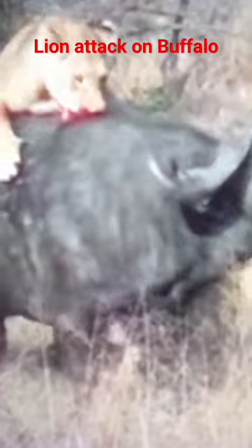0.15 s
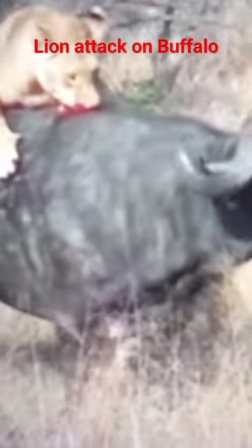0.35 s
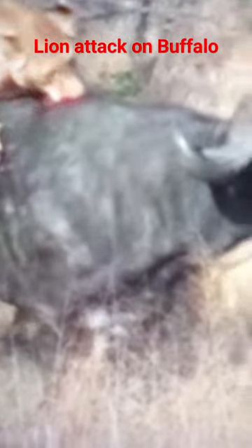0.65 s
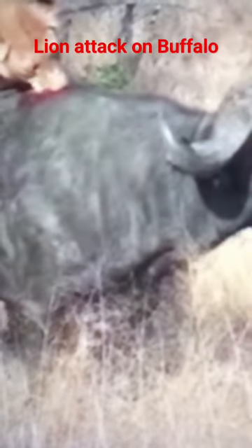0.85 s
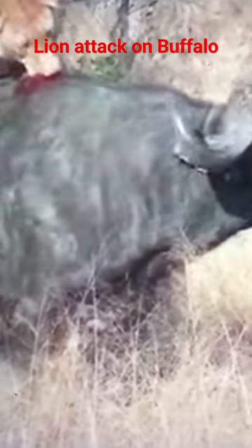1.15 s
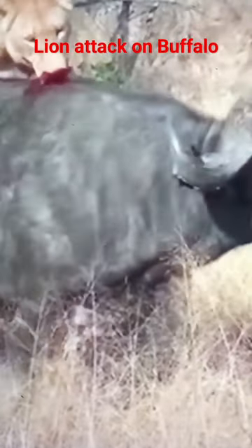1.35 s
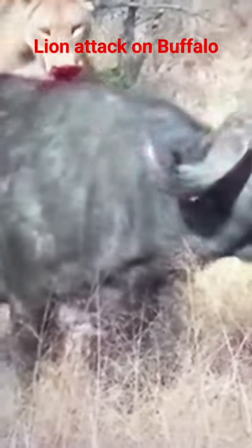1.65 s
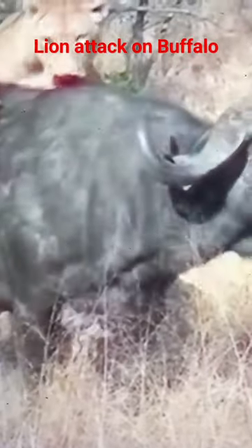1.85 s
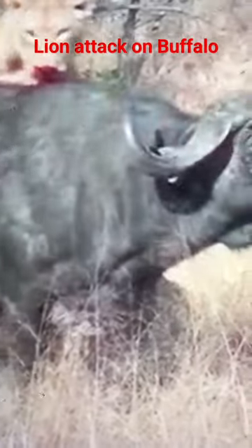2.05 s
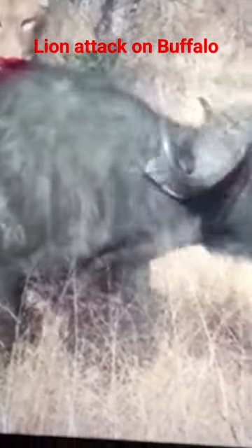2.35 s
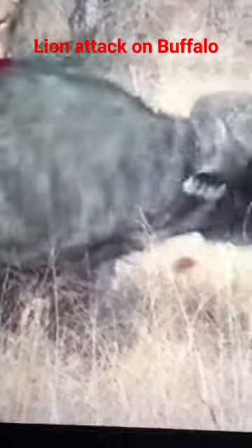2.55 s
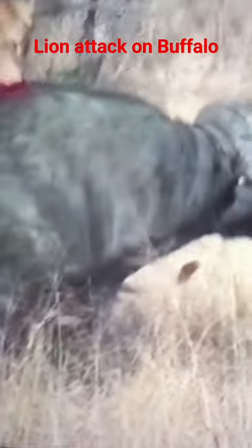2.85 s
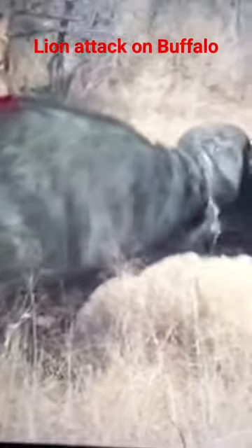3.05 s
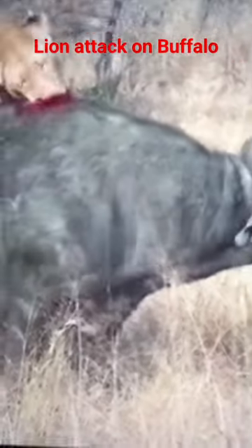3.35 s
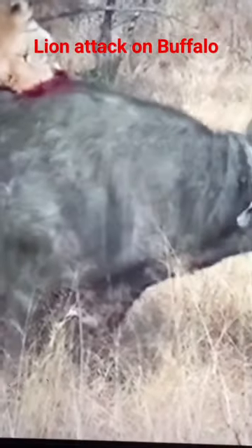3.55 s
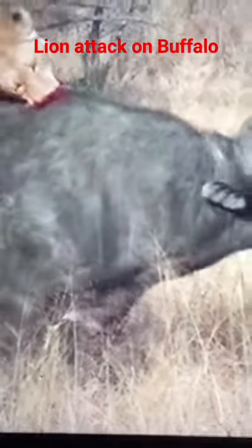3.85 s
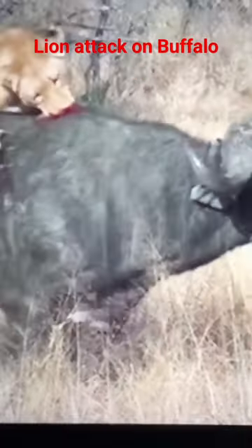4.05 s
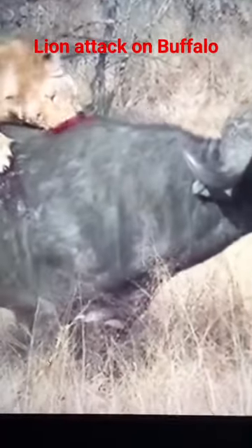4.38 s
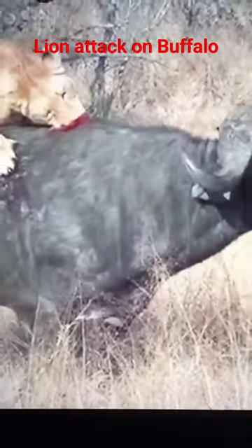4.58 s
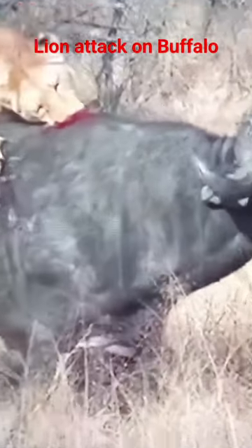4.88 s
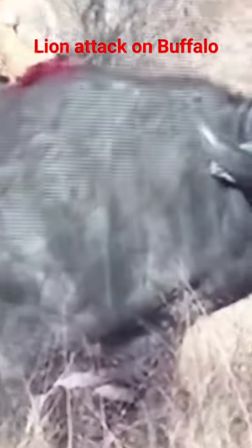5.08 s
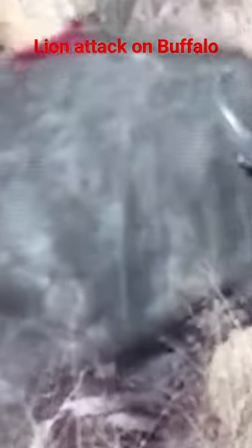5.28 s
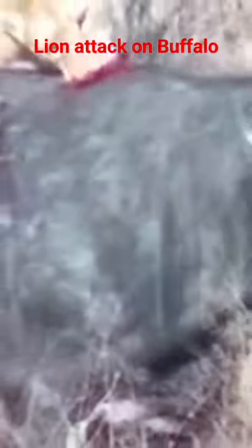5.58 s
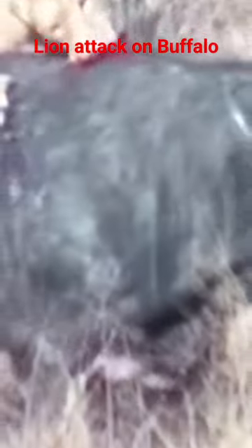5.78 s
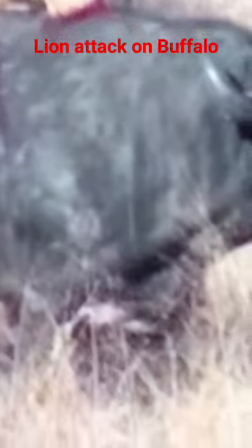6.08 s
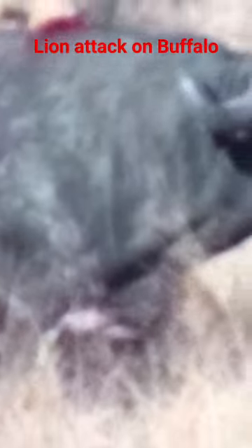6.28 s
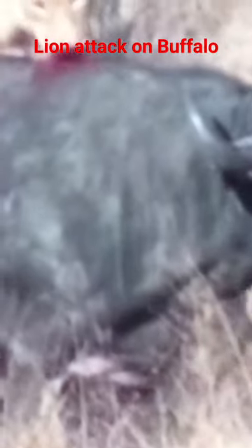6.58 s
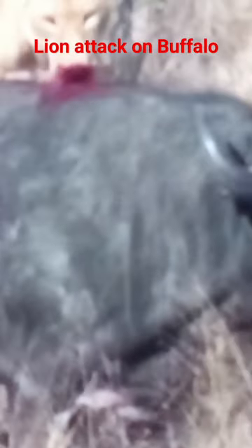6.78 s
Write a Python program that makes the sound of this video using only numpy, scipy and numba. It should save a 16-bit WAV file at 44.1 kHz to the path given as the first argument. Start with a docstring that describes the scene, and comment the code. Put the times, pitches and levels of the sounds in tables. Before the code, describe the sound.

After a brief silence, a buffalo bellows for about a second, its low rattling voice growing hoarse and collapsing into a rush of air. Dry growth crackles, a short huff and ragged throat creaks follow with a dull knock, then a longer, harsher bellow ends in another huff. Later come crackles, faint bird whistles and a last weak huff. One microphone outdoors, with leafy hiss and low murmur.

```python
"""Outdoors among dry, leafy growth, one microphone: a buffalo under attack bellows twice over a steady hiss.
Its vocal folds slap slowly enough to rattle, ringing the moving resonances of throat, mouth and nose.
Each bellow breaks up into a hoarse rush of air; a huff comes before the second and another near the end.
Ragged, uneven slaps lead into and out of the voice. Clumps of snaps make dry crackles, ringing modes a dull knock,
and gliding tones two faint pairs of bird whistles, over coloured noise for murmur and leaves and a low hum."""
import sys
import numpy as np
from scipy import signal
from scipy.fft import rfft, irfft
from scipy.io import wavfile
from scipy.ndimage import uniform_filter1d, minimum_filter1d
from numba import njit

SR = 44100
rng = np.random.default_rng(int(sys.argv[2]) if len(sys.argv) > 2 else 0)


def wrap_up_sound(samples):
    """Save the sound to the file named by the first command line argument, as 16-bit audio."""
    columns = np.atleast_2d(samples).T
    # keep every value between -1 and 1, then stretch to whole-number steps
    tamed = np.clip(columns, -1, 1)
    steps = np.round(tamed * 32767).astype(np.int16)
    wavfile.write(sys.argv[1], SR, steps)


N = 305524
TIME = np.arange(N) / SR
START_S = 0.18  # silence until here


def from_db(db):
    """Decibels to gain."""
    return 10 ** (np.asarray(db) / 20)


def rms_one(x):
    """Scale to unit rms."""
    return x / np.sqrt(np.mean(x ** 2) + 1e-20)


def along(rows, t):
    """Each column of a curve table at the times t."""
    s, *columns = np.transpose(rows)
    return [np.interp(t, s, c) for c in columns]


def drift(rate, t):
    """Random curve through knots of spread 1, rate knots per second."""
    knots = np.arange(0, N / SR + 1, 1 / rate)
    return np.interp(t, knots, rng.standard_normal(len(knots)))


def colour(x, spectrum):
    """Causal (minimum-phase) filter that keeps the power of white noise."""
    size = 4096
    hz, db = np.transpose(spectrum)
    f = np.maximum(np.arange(size // 2 + 1) * SR / size, 1)
    # beyond the ends of the curve: 48 dB per octave, 60 dB at most
    octaves_outside = np.maximum(np.log2(hz[0] / f), 0) + np.maximum(np.log2(f / hz[-1]), 0)
    gain = from_db(np.interp(np.log(f), np.log(hz), db) - np.minimum(48 * octaves_outside, 60))
    # folding the cepstrum forward gives minimum phase
    cepstrum = irfft(np.log(gain))[:size // 2]
    cepstrum[1:] *= 2
    response = irfft(np.exp(rfft(cepstrum, size)))
    return signal.fftconvolve(x, response / np.linalg.norm(response))[:len(x)]


def noise(spectrum):
    """White noise coloured by a spectrum, near unit rms."""
    return colour(rng.standard_normal(N), spectrum)


@njit
def two_pole(x, angle, r):
    """Band-pass with a moving centre and gain 1 on top."""
    y = np.zeros(len(x))
    for i in range(2, len(x)):
        y[i] = (1 - r * r) / 2 * (x[i] - x[i - 2]) + 2 * r * np.cos(angle[i]) * y[i - 1] - r * r * y[i - 2]
    return y


def resonate(x, hz, width):
    """One resonance, steady or moving."""
    angle = 2 * np.pi * hz / SR * np.ones(len(x))
    return two_pole(x + 1e-18, angle, np.exp(-np.pi * width / SR))


def formant(x, hz, width):
    """Three staggered resonances in a row: a full top with dark valleys on either side."""
    split = np.sqrt(3) / 4 * width
    middle = resonate(x, hz, width)
    return resonate(resonate(middle, hz - split, width / 2), hz + split, width / 2)


def evened(x):
    """Hold the level near rms 1 over a few slaps."""
    power = uniform_filter1d(uniform_filter1d(x ** 2, size=2200), size=1800)
    return x / np.sqrt(np.maximum(power, 0) + 1e-3 * np.mean(x ** 2))


def bursts(times, levels_db, rise, fall):
    """Envelope of short bursts that swell exponentially up to their times and die away after."""
    out = np.zeros(N)
    for s, db in zip(times, levels_db):
        near = slice(int((s - .02) * SR), int((s + .12) * SR))
        age = TIME[near] - s
        out[near] += from_db(db) * np.exp(np.minimum(age / rise, -age / fall))
    return out


def loud(x, knee_db):
    """How loud a sound is from moment to moment, 0-1; one half at the knee."""
    power = abs(uniform_filter1d(x ** 2, size=6000))
    return power / (power + from_db(knee_db) ** 2)


# surfaces close to the path to the microphone: delay [t/s], gain
ECHOES = [(.0027, 0.027), (.00435, 0.27), (.0079, .12)]


def surroundings(x, scatter_db=-12, t60=0.41):
    """A few close reflections and a short scattered tail."""
    at, t = np.arange(len(x)), TIME[:SR // 3]
    early = sum(gain * np.interp(at - delay * SR, at, x, left=0) for delay, gain in ECHOES)
    tail = rng.standard_normal(len(t)) * from_db(-60 * t / t60) * (t > .005)
    scattered = signal.fftconvolve(x, tail / np.linalg.norm(tail))[:len(x)]
    return x + early + from_db(scatter_db) * scattered


# low murmur of the place, spectrum shape: f/Hz, level/dB
MURMUR = [(15, -21.5), (25, -23), (171, -4.5), (204, -7), (400, -14), (429, -12.5), (452, -8), (494, -14),
          (530, -8), (633, -3), (667, -5.5), (916, -6.5), (1150, -9.5), (1420, -17), (1700, -9.5),
          (2210, -37.5), (3740, -120)]
# even microphone hiss, spectrum shape: f/Hz, level/dB
MIC_HISS = [(5000, 1.8), (10000, 2), (15500, -2)]
# leafy hiss, spectrum shape: f/Hz, level/dB
LEAVES = [(880, -43.5), (1500, -30), (1820, -15.5), (1990, -9), (2390, 2), (3260, -10.5), (3950, -8.5),
          (4470, -23.5), (4980, -18.5), (5330, -16), (5840, -22.5), (6140, -30), (7880, -38.5),
          (11000, -49.5), (14300, -78), (22000, -120)]
# highest rustle and hiss, spectrum shape: f/Hz, level/dB
AIR_HISS = [(3820, -52), (6500, -25), (7190, 0.5), (8220, 1), (9670, -13.5), (13000, -21)]
# faint hum: f/Hz, rms level/dB
HUM = [(133.7, -71.5), (156, -89.5), (178.5, -68.5)]
# the dry growth stirs: centre [t/s], half length [t/s], leafy hiss [level/dB], high rustle [level/dB]
STIRS = [(2.365, 0.38, -46.5, -66.5), (6.305, 0.53, -49, -76), (6.95, 0.21, -44, -86)]
# levels before flicker and dips
MURMUR_DB, MIC_HISS_DB, LEAVES_DB, RUSTLE_DB = -52, -79, -53.5, -84
FADE_IN_S = 0.25


def background(steady_dip_db, leaves_dip_db, flicker_db=2.0):
    """Low murmur, a leafy hiss and a high rustle that swell when the growth stirs, and a faint wavering hum."""
    leafy, rustle = from_db(LEAVES_DB), from_db(RUSTLE_DB)
    for s, half_s, leafy_db, rustle_db in STIRS:
        swell = np.exp(-((TIME - s) / half_s) ** 2)
        leafy = leafy + from_db(leafy_db) * swell
        rustle = rustle + from_db(rustle_db) * swell
    hum = np.zeros(N)
    for hz, db in HUM:
        wavering_hz = hz + 1.2 * drift(7.0, TIME)
        hum += from_db(db) * np.sqrt(2) * np.sin(2 * np.pi * np.cumsum(wavering_hz) / SR)
    flicker = from_db(flicker_db * drift(55, TIME))
    leaves = (leafy * noise(LEAVES) + rustle * noise(AIR_HISS)) * flicker
    steady = from_db(MURMUR_DB) * noise(MURMUR) + from_db(MIC_HISS_DB) * noise(MIC_HISS)
    fade_in = np.clip((TIME - START_S) / FADE_IN_S, 0, 1)
    return ((hum + steady) * from_db(steady_dip_db) + leaves * from_db(leaves_dip_db)) * fade_in


# distant bird whistles: start [t/s], length [t/s], start f/Hz, end f/Hz, peak level/dB before the reflections
CHIRPS = [(5.62, .06, 7100, 6470, -71), (5.679, 0.05, 5800, 5300, -57), (6.672, 0.086, 6800, 6500, -65),
          (6.719, 0.052, 5520, 5060, -46.5)]


def birds():
    """Thin, wavering, falling whistles, blurred by distance."""
    out = np.zeros(N)
    for s, length, start_hz, end_hz, db in CHIRPS:
        part = np.clip((TIME - s) / length, 0, 1)
        hz = start_hz + (end_hz - start_hz) * part + 150 * drift(610, TIME)
        out += from_db(db) * np.sin(np.pi * part) * np.sin(2 * np.pi * np.cumsum(hz) / SR)
    return surroundings(out, scatter_db=-8, t60=.25)


# modes of a hollow thing: f/Hz, width [f/Hz], gain [level/dB]
KNOCK = [(128, 120, 15.5), (337, 390, 25.5), (514, 230, 31), (4170, 5000, -7.5)]
KNOCK_S = 2.691


def knock():
    """One sharp contact on something hollow: a click rings its modes to a dull knock."""
    click = np.zeros(N)
    click[int(KNOCK_S * SR)] = 1
    return sum(from_db(db) * formant(click, hz, width) for hz, width, db in KNOCK)


# dry crackles: t/s, body [level/dB], treble [level/dB], both before trim and colour
CRACKLES = [(2.232, -31.5, -40), (2.267, -37, -46), (2.2735, -31, -59), (2.299, -27.5, -41),
            (2.321, -27.5, -43), (2.353, -29.5, -40.5), (2.376, -32, -55), (2.391, -28.5, -53),
            (2.4085, -24.5, -41), (3.13, -55, -51), (3.203, -44, -50), (4.284, -47, -51), (4.357, -46, -49),
            (4.409, -50, -51), (4.466, -42, -54), (5.877, -35.5, -37.5), (5.907, -46, -45),
            (5.917, -45, -49), (5.923, -33, -58), (5.949, -28, -38.5), (5.967, -37, -46),
            (6.003, -32.5, -39), (6.027, -34, -47), (6.057, -27, -41), (6.078, -29.5, -39),
            (6.108, -39, -43), (6.117, -51, -48), (6.1248, -31, -60), (6.1511, -28.5, -37),
            (6.169, -34.5, -43), (6.181, -42, -63), (6.202, -29.5, -36.5), (6.2587, -25.5, -40.5)]
# body of the earlier run, then of the later run, spectrum shape: f/Hz, level/dB
CRACKLE_BODY = [
    [(240, -68), (400, -24), (541, -5), (766, -4), (934, -7.5), (1690, -2), (2840, -3), (3490, -20),
     (3800, -12), (4940, -36), (8360, -120)],
    [(240, -49), (400, -32), (647, -6.5), (842, 0.5), (1130, -25.5), (1390, -7.5), (1820, -7), (2080, 4.5),
     (2330, 2), (3090, -5.5), (3800, -49.5), (4940, -71), (8360, -120)],
]
# treble of the crackles, spectrum shape: f/Hz, level/dB
CRACKLE_TOP = [(3600, -30), (4000, 4), (4740, 9.5), (5400, 19), (6000, 9.5), (6740, 2), (7930, 5.5),
               (9500, -15), (13000, -33)]
# vocal folds, one table per bellow, from its first slap to its last: t/s, slap rate [f/Hz]
PITCH = [
    [(0.2169, 80.63), (0.28, 82.98), (0.5, 77.7), (0.61, 79.07), (0.75, 77.72), (1.06, 69.5), (1.21, 67.05),
     (1.36, 54.53)],
    [(2.7449, 44.35), (2.83, 62.18), (2.91, 69.6), (3.08, 74.88), (3.29, 76.86), (3.36, 78.06),
     (3.48, 74.38), (3.75, 76.19), (3.84, 74.95), (4.15, 76.27), (4.22, 73.83), (4.42, 73.54), (4.5, 75.09),
     (5.045, 69.12)],
]  # also played by folds(); its second start divides the crackle runs


def crackles(body_db=-1, top_db=0.5, grain_db=0.0, follow_s=0.013):
    """Each crackle is a clump of tiny snaps (noise bursts), with weaker clumps scattered around it."""
    rise_s, fall_s, follow_db = .0018, .0024, -15
    s, peak_db, treble_db = np.transpose(CRACKLES)
    strays = (s[:, None] + follow_s * rng.uniform(-1.42, 1.6, (len(s), 2))).ravel()

    def clumps(db):
        """Main bursts and their strays, filled with noise."""
        grain = rng.standard_normal(N) * from_db(grain_db * drift(1500, TIME))
        main = bursts(s + 0.0024, db, rise_s, fall_s)
        return grain * (main + bursts(strays, np.repeat(db, 2) + follow_db, rise_s, fall_s))

    body, top = clumps(peak_db + body_db), clumps(treble_db + top_db)
    later = TIME > PITCH[1][0][0]
    body = sum(colour(body * run, shape) for run, shape in zip([~later, later], CRACKLE_BODY))
    return surroundings(body + colour(top, CRACKLE_TOP), scatter_db=-10, t60=.14)


# huffs of hoarse air: start [t/s], attack [t/s], hold [t/s], release [level/dB per s],
# throat, rasp and hiss [level/dB, before tilt and gusts], hiss f/Hz, hiss width [f/Hz]
HUFFS = [(1.345, 0.045, 0.15, 157, -33, -30, -57, 7640, 1990),
         (2.435, 0.14, 0.053, 595, -40.5, -32, -61, 8400, 2700),
         (5.003, 0.086, 0.15, 171, -33, -28, -57.5, 8330, 3000),
         (6.222, 0.034, 0.09, 76, -30, -37, -67, 7700, 1990)]
# air in the throat, one spectrum shape per huff: f/Hz, level/dB
AIR_THROAT = [
    [(120, -64), (200, -13), (237, -52), (300, -11), (365, -23.5), (538, -10.5), (727, -5), (869, 4),
     (1280, -1.5), (1900, -22), (2470, -31), (4180, -120)],
    [(180, -73), (300, -21), (1030, -7), (1150, -4), (1440, -14), (1900, -30), (2470, -44), (4180, -120)],
    [(76, -48), (130, -15), (238, -33), (298, -13.5), (408, -28), (452, -6), (523, -17), (876, 3.5),
     (1010, -4.5), (1280, -6.5), (1450, -22), (1900, -14), (2470, -41), (4180, -120)],
    [(180, -64), (300, -29), (381, -30), (552, -16), (838, 3), (1030, -12.5), (1350, -13), (1460, -25),
     (1900, -28), (2470, -46), (4180, -120)],
]
# raspy air, spectrum shape: f/Hz, level/dB
AIR_RASP = [(940, -38), (1600, -0.5), (1910, -6), (2130, 10), (2310, 2.5), (3110, 0.5), (3390, -1),
            (3710, 3), (4000, -10), (4330, -5.5), (4700, -24.5), (5470, -16), (6170, -42.5), (6800, -56),
            (8840, -106), (15000, -120)]
# change while a huff is held: throat, rasp, hiss [level/dB per s]
HUFF_TILT_DB_PER_S = (24.5, -36, -47)
# flaps of the slack throat that let gusts through: t/s, gust against the steady air [level/dB]
FLAPS = [(1.405, 3), (1.433, -5), (1.459, 2), (1.489, 6), (1.51, 1), (1.542, -8), (1.574, 3), (5.085, -10),
         (5.103, -19), (5.139, -4), (5.159, 1.5), (5.181, 1), (5.213, -10), (5.246, -4), (6.25, -8),
         (6.285, -12), (6.293, -1), (6.339, 0), (6.354, -4), (6.374, 1), (6.424, -4)]


def huffs(flutter_db=2.0, flutter_hz=110, steady_db=-3.0, gust_rise_s=0.0017, gust_fall_s=0.0028):
    """Air rushes through the slack throat, whose flapping lets gusts through; each huff goes from raspy to hollow."""
    rasp, white = noise(AIR_RASP), rng.standard_normal(N)
    out = np.zeros(N)
    for huff, shape in zip(HUFFS, AIR_THROAT):
        start, attack_s, hold_s, release_db_per_s, *levels_db, hiss_hz, hiss_width = huff
        age = np.maximum(TIME - start, 0)
        held = np.minimum(age, attack_s + hold_s)
        envelope = np.minimum(age / attack_s, 1) * from_db(-release_db_per_s * (age - held))
        hiss = rms_one(formant(white, hiss_hz, hiss_width))
        for part, db, tilt_db in zip([noise(shape), rasp, hiss], levels_db, HUFF_TILT_DB_PER_S):
            out += envelope * from_db(db + tilt_db * held) * part
    gusts = 1 + bursts(*np.transpose(FLAPS), gust_rise_s, gust_fall_s)
    ragged = from_db(steady_db + flutter_db * drift(flutter_hz, TIME))
    return surroundings(out * gusts * ragged, scatter_db=-12.5, t60=0.3)


# single slaps where the folds start up or give way:
# t/s, body [level/dB], treble [level/dB], both before trim and colour
CREAKS = [(1.372, -24, -38), (1.403, -31, -35), (1.429, -16.5, -28), (1.456, -23.5, -37),
          (2.461, -23.5, -42.5), (2.521, -23, -38), (2.555, -34, -41), (2.586, -22, -37), (2.592, -28, -32),
          (2.615, -19, -22.5), (2.641, -10.5, -46), (2.675, -11.5, -30), (2.699, -5, -28.5),
          (2.711, -6.5, -29.5), (2.721, -12.5, -26), (5.058, -15.5, -29.5), (5.083, -40, -37),
          (5.1, -31, -26)]


def creaks(body_db=-1, treble_db=3):
    """Ragged slaps of the folds, too unevenly spaced to make a steady pitch: short bursts of coloured noise."""
    s, peak_db, top_db = np.transpose(CREAKS)
    body = bursts(s + 0.0017, peak_db + body_db, 0.00023, 0.0012) * rng.standard_normal(N)
    top = bursts(s + 0.00048, top_db + treble_db, 0.00012, 0.0034) * rng.standard_normal(N)
    # spectrum shapes: f/Hz, level/dB
    body = colour(body, [(450, -15.5), (800, 7.5), (1200, 4.5), (1680, 7.5), (2050, -8.0)])
    top = colour(top, [(2200, -1.5), (2900, 12.5), (3900, -4), (4600, -19.5)])
    return surroundings(body + top)


def folds(pitch, t, roughness, limp_db, jitter_s=0.00021, limp_s=.00018, shimmer_db=-0.2, leak_s=0.0024):
    """One slap per cycle and the turbulence leaking around it; rough folds limp: a crisp slap, then a weak, airy one."""
    cycles = np.cumsum(along(pitch, t)[0] * (t > pitch[0][0])) / SR
    slaps = t[np.flatnonzero(np.diff(np.ceil(cycles)))]
    slaps = slaps[slaps < pitch[-1][0]]
    rough = np.interp(slaps, t, roughness)
    chance = rng.standard_normal((len(slaps), 2))
    turn = (-1) ** np.arange(len(slaps))  # every other slap
    slaps = slaps + rough * (jitter_s * chance[:, 0] + limp_s * turn)
    closure_db = rough * (shimmer_db * chance[:, 1] + limp_db * turn)
    at = np.clip((slaps - t[0]) * SR, 0, len(t) - 1).astype(int)
    pulses, gaps = np.zeros((2, len(t)))
    pulses[at] = from_db(closure_db)
    gaps[at] = from_db(-closure_db)  # a weak slap leaks more air
    opening = signal.fftconvolve(gaps, np.exp(-abs(np.arange(-400, 401)) / SR / leak_s), "same")
    leak = rms_one(opening * rng.standard_normal(len(t))) * np.sqrt(abs(roughness))
    return rms_one(pulses), leak


# turbulence against the slaps, before the roughness scales it: f/Hz, level/dB
LEAK = [(400, -8.5), (1100, -6), (1800, 1.5), (2800, 4), (4000, 5.5), (8000, 3)]
SKIRT_STEEPNESS = 5.3  # power law of each resonance's flanks


def throat(pulses, leak, roughness, modes, hop_size=256):
    """Slaps and turbulence ring moving resonances (Hz, width Hz, dB) all at once (minimum phase), held even."""
    size = 8 * hop_size
    starts = np.arange(0, len(pulses) - 2 * hop_size, hop_size)
    f = np.maximum(np.arange(size // 2 + 1) * SR / size, 1)

    def now(curve):
        """A control at the middle of each block."""
        return curve[starts + hop_size, None] if np.ndim(curve) else curve

    power = from_db(-62.5) ** 2 / (1 + (f / 8000) ** 8)  # fills the valleys
    for hz, width, db in modes:
        offset = abs(2 * (f - now(hz)) / now(width))
        power = power + from_db(now(db)) ** 2 / (1 + offset ** SKIRT_STEEPNESS)
    cepstrum = irfft(np.log(power / power.mean(axis=1, keepdims=True)) / 2)[:, :size // 2]
    cepstrum[:, 1:] *= 2
    response = np.exp(rfft(cepstrum, size))
    leak_hz, leak_db = np.transpose(LEAK)
    air = from_db(np.interp(f, leak_hz, leak_db))
    block = starts[:, None] + np.arange(2 * hop_size)
    window = signal.get_window("hann", 2 * hop_size)
    source = rfft(pulses[block] * window, size) + air * rfft(leak[block] * window, size)
    source = source / np.sqrt(1 + air ** 2 * abs(now(roughness)))
    out = np.zeros(len(pulses) + size)
    for i, ringing in zip(starts, irfft(source * response)):
        out[i:i + size] += ringing
    return evened(out[:len(pulses)])


# the bellows: attack [t/s], level/dB before the sag, seventh resonance f/Hz, roughness at first [0-1],
# turns hoarse after [t/s], roughness then [0-1], limp: even slaps against the mean at full roughness [level/dB]
BELLOWS = [(0.29, -24.5, 5200, 0.1, .385, 0.78, -2.0), (0.0076, -23.5, 5680, 0.12, 0.45, 0.51, 1.5)]
# jaw and tongue move the lower resonances while the throat strains, one table per bellow:
# t/s, main f/Hz, third f/Hz, third width [f/Hz], third [level/dB against main], nasal f/Hz, strain [about 0-1]
MOUTH = [
    [(.3, 1090, 1910, 505, -12.5, 291, 0.07), (.48, 1160, 1980, 497, -13.5, 289, 0.1),
     (.75, 1142, 1950, 280, -10, 262.4, 0.37), (1.05, 1124, 1960, 171, -2.5, 287, 1.02),
     (1.2, 1150, 1996, 150, 2, 293, 1.1), (1.36, 1110, 2140, 150, -5, 283, 0.4)],
    [(2.78, 1300, 1527, 201, 5, 278, 0.7), (2.9, 1350, 1630, 270, -6, 290, 0.33),
     (3.06, 1262, 1640, 280, -1, 291, 0.84), (3.26, 1182, 1640, 211, -4, 285, 0.06),
     (3.4, 1144, 1590, 250, -20.5, 266, 0), (3.52, 1100, 1790, 220, -13.5, 290, 0),
     (4.05, 1160, 1960, 280, -24.5, 313, 0), (4.36, 1176, 1880, 335, -9, 292, 0.56),
     (4.85, 1117, 1990, 400, -9, 290, 0.78), (5.05, 970, 2180, 300, -9.5, 270, 1)],
]
# upper resonances shift and swell as the throat tightens, one table per bellow, levels against main before flicker:
# t/s, fourth f/Hz, level/dB, rasp f/Hz, level/dB, fifth f/Hz, level/dB, sixth level/dB, seventh level/dB
THROAT = [
    [(.3, 2570, -46, 3250, -22, 3560, -21, -38, -37.5),
     (.5, 2590, -17.5, 3200, -29, 3580, -16.5, -25.5, -34),
     (.75, 2650, -11, 2930, -18, 3560, -19, -25, -36), (1.02, 2550, -16.5, 3020, -14, 3750, -9.5, -37, -35),
     (1.27, 2480, -9, 3100, -7, 3700, -8, -39, -30)],
    [(2.82, 2670, -17, 3180, -20.5, 3680, -19, -44, -40),
     (3.05, 2500, -10, 2960, -21.5, 3710, -17.5, -30, -37),
     (3.27, 2600, -12, 2810, -13.5, 3900, -20.5, -33, -44),
     (3.65, 2590, -15, 2900, -13.5, 3840, -21, -31.5, -44),
     (4, 2650, -19.5, 2770, -7.5, 3850, -15.5, -26, -38),
     (4.4, 2610, -11.5, 2800, -8, 3840, -12.5, -27, -41),
     (4.65, 2560, -9.5, 2970, -10.5, 3810, -20.5, -41, -35.5),
     (4.9, 2440, -8.5, 2990, -7.5, 3650, -20.5, -32, -43), (5.03, 2530, -8, 3080, -2, 3680, -14, -18, -34)],
]
# resonances that stay put: f/Hz, width [f/Hz], level/dB against the main one
HEAD = [(874, 86, -1.5), (1205, 280, 2), (1677, 160, -12.5), (2540, 2230, -28.5), (7600, 970, -52)]
# nasal, against the mouth: level/dB, more at strain 1 [dB], more by the end of the bellow [dB]
NASAL = (-28.5, 0.64, 6.1)
# low resonance, against the main one: level/dB, more at strain 1 [dB], more by the end of the bellow [dB]
LOW = (-9.5, 11.4, 0)
LOW_SHARE, LOW_STRAIN_HZ = 0.4376, 42.6  # low resonance: share of the main one's Hz, rise at strain 1
SIXTH_HZ, NASAL_WIDTH_HZ = 4270, 94.3
RASP_FLICKER_DB, RASP_FLICKER_HZ = 1.07, 25.08  # spread and knot rate of the upper levels
SAG_DB, SAG_POWER = 4, 2.1  # the voice sags as the lungs empty, mostly late
FALTER_S, FALTER_DB = 0.042, 3  # the last slaps lose their force
HOARSE_OVER_S = 0.0067
MOUTH_LOW_CUT_HZ = 320  # the mouth radiates little bass


def bellow(call, pitch, mouth_shape, throat_shape, nasal_air=0.31, release_s=0.0099, nasal_release_s=0.17):
    """Slaps ring the moving throat and nose; the rougher the folds, the more turbulence joins the slaps."""
    attack_s, level_db, seventh_hz, rough_first, hoarse_s, rough_later, limp_db = call
    start, end = pitch[0][0], pitch[-1][0]
    span = (TIME > start - .008) & (TIME < end + .16)
    t = TIME[span]
    age, after = t - t[0], np.maximum(t - end, 0)
    spent = np.minimum(age / (end - start), 1)
    effort = from_db(level_db - SAG_DB * spent ** SAG_POWER) * np.minimum(age / attack_s, 1)
    falter = from_db(-FALTER_DB * np.clip(1 + (t - end) / FALTER_S, 0, 1))
    hoarse = (1 + np.tanh((age - hoarse_s) / HOARSE_OVER_S)) / 2
    roughness = rough_first + (rough_later - rough_first) * hoarse
    main_hz, third_hz, third_width, third_db, nasal_hz, strain = along(mouth_shape, t)
    fourth_hz, fourth_db, rasp_hz, rasp_db, fifth_hz, fifth_db, sixth_db, seventh_db = along(throat_shape, t)
    low_hz = LOW_SHARE * main_hz + LOW_STRAIN_HZ * strain
    nasal_db, low_db = [db + strain_db * strain + spent_db * spent for db, strain_db, spent_db in (NASAL, LOW)]
    pulses, leak = folds(pitch, t, roughness, limp_db)
    # once the folds stop, plain air keeps the resonances sounding
    leak = leak + 0.27 * (after > 0) * rng.standard_normal(len(t))
    # f/Hz, width [f/Hz], level/dB
    lower = [(low_hz, 90, low_db), (main_hz, 480, 0), (third_hz, third_width, third_db)]
    upper = [(fourth_hz, 260, fourth_db), (rasp_hz, 420, rasp_db), (fifth_hz, 300, fifth_db),
             (SIXTH_HZ, 280, sixth_db), (seventh_hz, 560, seventh_db)]
    upper = [(hz, width, db + RASP_FLICKER_DB * drift(RASP_FLICKER_HZ, t)) for hz, width, db in upper]
    mouth = throat(pulses, leak, roughness, lower + upper + HEAD)
    mouth = signal.sosfilt(signal.butter(2, MOUTH_LOW_CUT_HZ, "high", fs=SR, output="sos"), mouth)
    nose = from_db(nasal_db) * evened(formant(pulses + nasal_air * leak, nasal_hz, NASAL_WIDTH_HZ))
    # the nose rings on longer than the mouth
    mouth = mouth * falter * np.exp(-after / release_s)
    nose = nose * np.exp(-after / nasal_release_s)
    out = np.zeros(N)
    out[span] = effort * (mouth + nose)
    return surroundings(out, scatter_db=-12.5, t60=0.5)


# the background sinks while the voice is loud: depths in dB, voice level for half of it in dB
DUCK_DB, LEAVES_DUCK_DB, DUCK_KNEE_DB = 3.5, 4.5, -22
# the leaves also sink under the crackles: depth in dB, crackle level for half of it in dB
CRACKLE_DUCK_DB, CRACKLE_KNEE_DB = 4.5, -48.5


def scene():
    """All sources at one microphone; the background sinks under the voice, its leaves also under the crackles."""
    voice = sum(bellow(*call) for call in zip(BELLOWS, PITCH, MOUTH, THROAT))
    snaps = crackles()
    calling = loud(voice, DUCK_KNEE_DB)
    leaves_dip_db = -LEAVES_DUCK_DB * calling - CRACKLE_DUCK_DB * loud(snaps, CRACKLE_KNEE_DB)
    floor = background(-DUCK_DB * calling, leaves_dip_db)
    return (floor + birds() + knock() + snaps + huffs() + creaks() + voice)[None]


CUTOFF_HZ = 16000


def record(dry, ceiling=0.26):
    """The sound opens quickly, a fast soft limiter evens out the strongest slaps, the top is cut."""
    opened = dry * np.clip((TIME - START_S) / 0.012, 0, 1)
    # running peak, smoothed
    peak = uniform_filter1d(-minimum_filter1d(-abs(opened), size=66), size=44)
    limited = opened / np.sqrt(np.sqrt(1 + (peak / ceiling) ** 4))
    return signal.sosfilt(signal.cheby2(16, 60, CUTOFF_HZ, fs=SR, output="sos"), limited)


dry = scene()
out = record(dry)
wrap_up_sound(out)
```